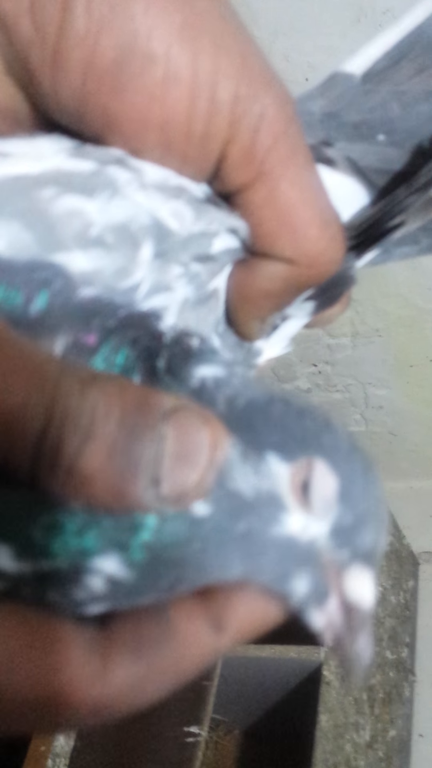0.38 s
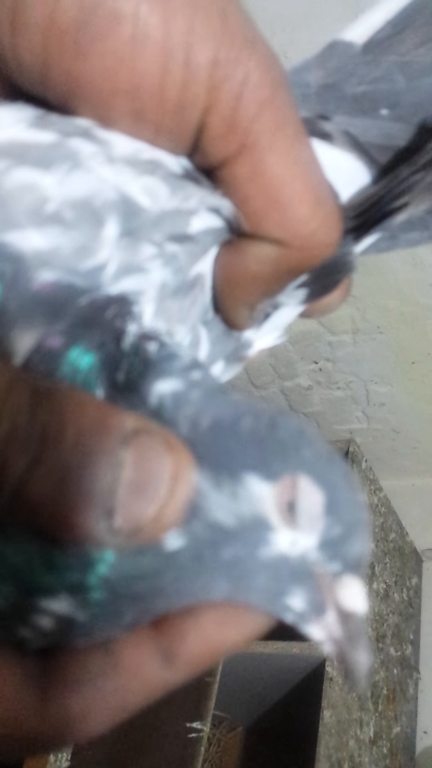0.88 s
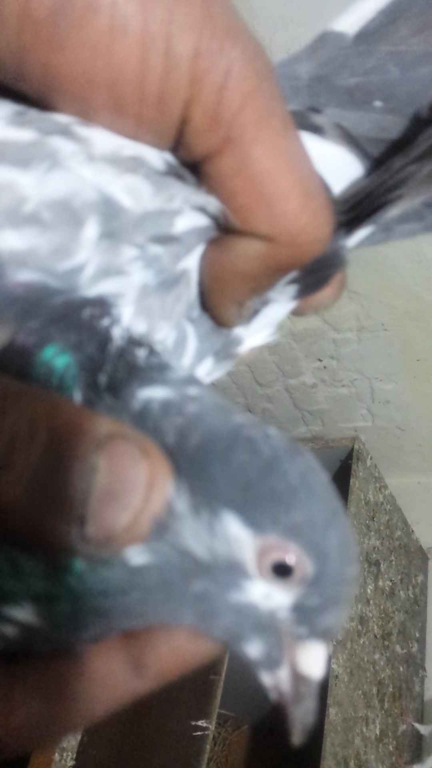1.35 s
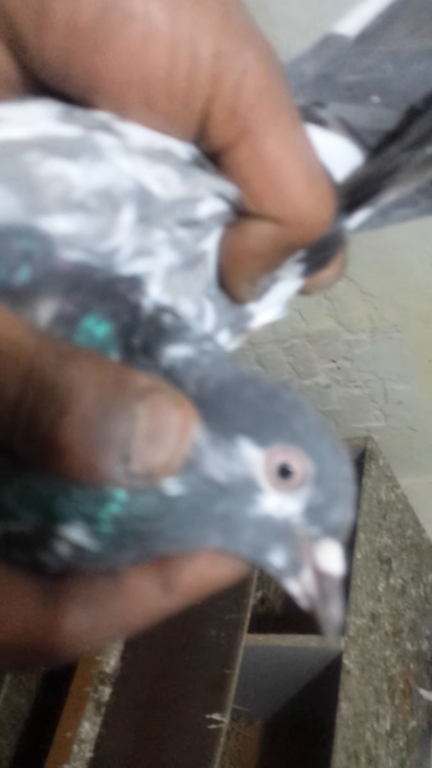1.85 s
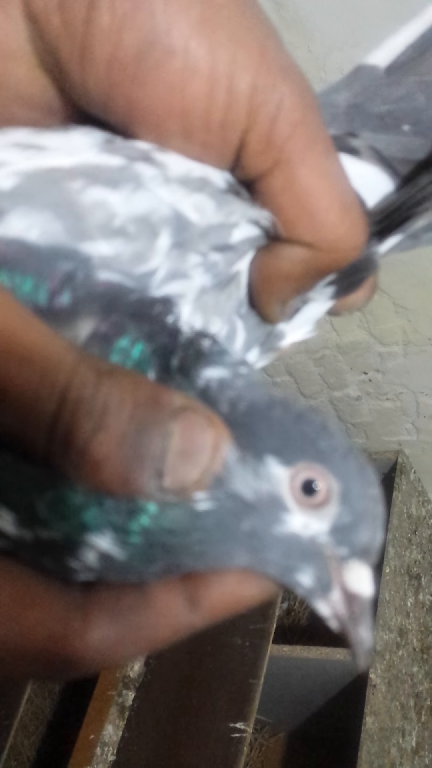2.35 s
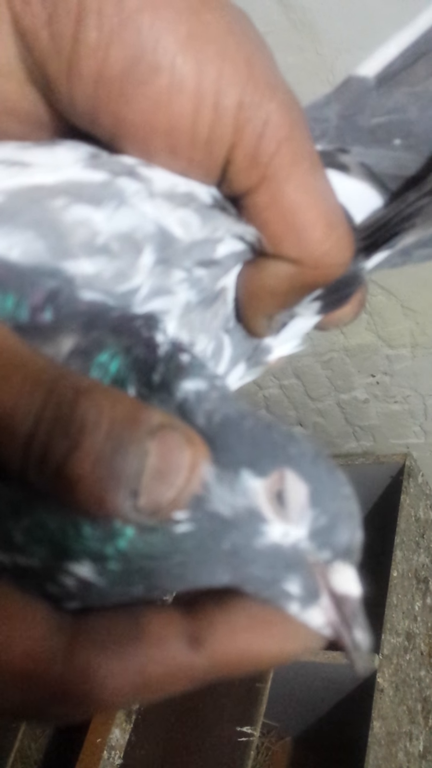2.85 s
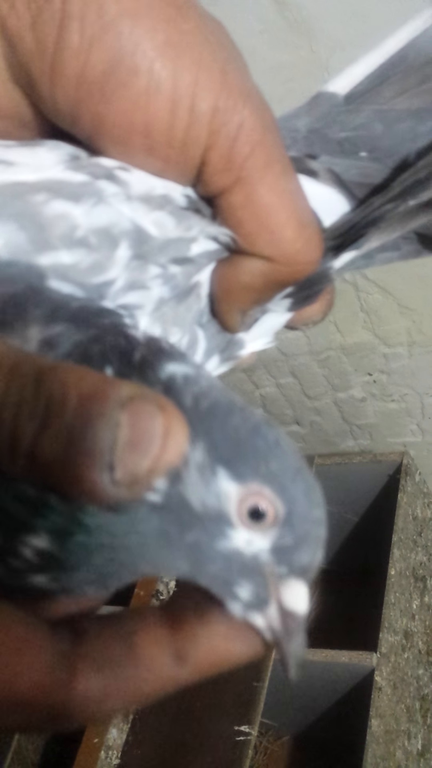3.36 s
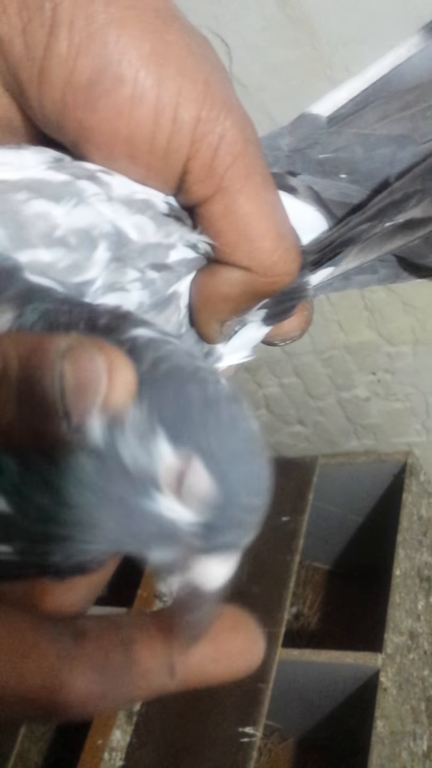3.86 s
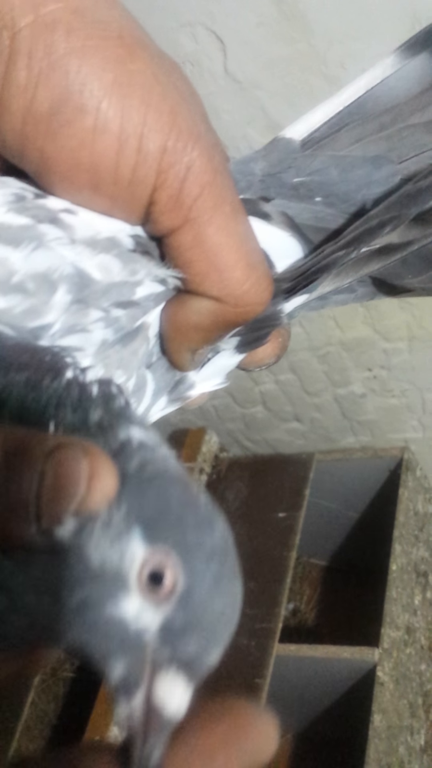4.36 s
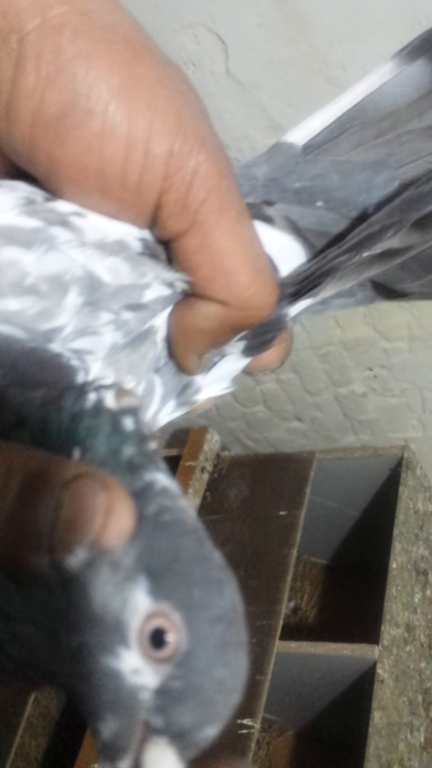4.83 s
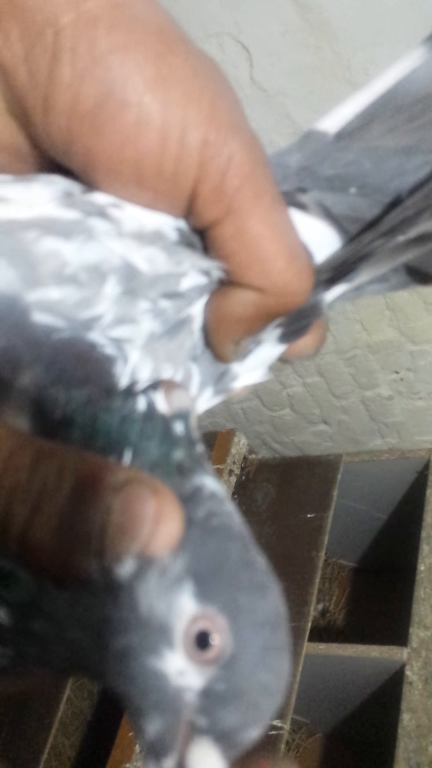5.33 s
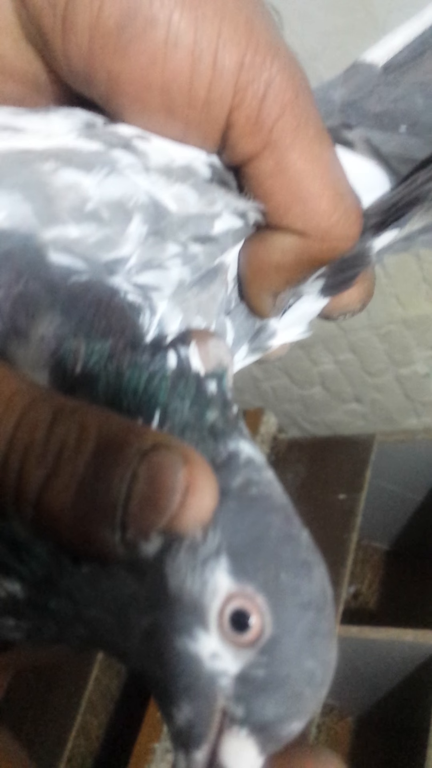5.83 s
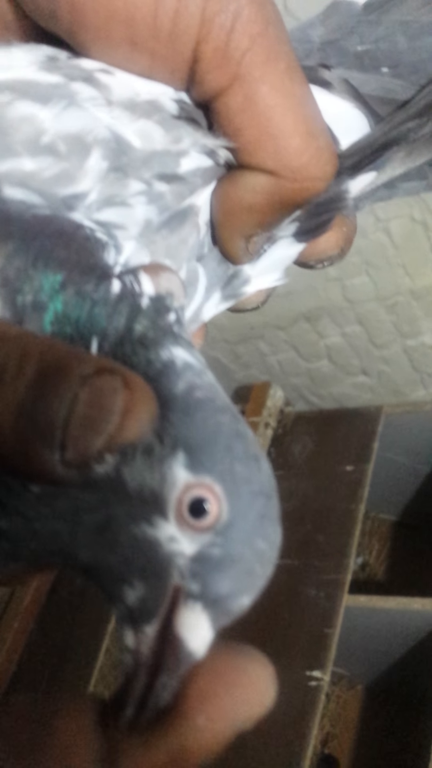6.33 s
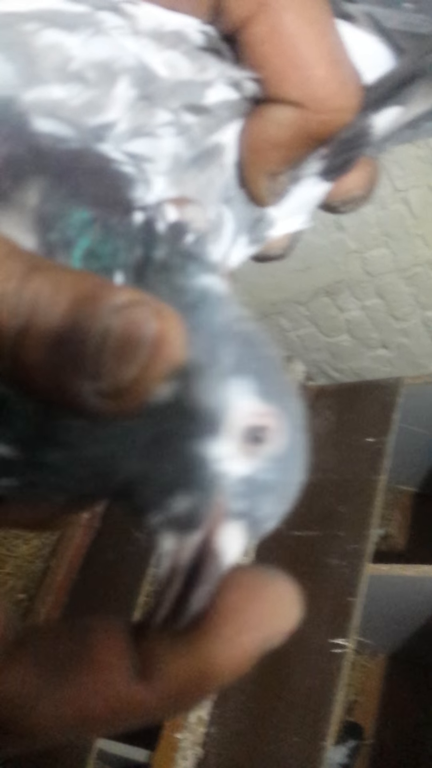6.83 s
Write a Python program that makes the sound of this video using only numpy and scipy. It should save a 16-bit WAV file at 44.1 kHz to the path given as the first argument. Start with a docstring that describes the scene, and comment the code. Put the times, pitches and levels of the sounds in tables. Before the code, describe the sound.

A bird is handled close to a small two-port microphone in a small boarded room. Dry snaps, scrapes and two light knocks come first, then a brief grunt and a violent flap, two strong strokes with low thuds on boards. Smaller cracks and rustles follow, dwindling. The last seconds are very quiet: fine feather strokes, faint distant mewing calls, and needle-thin squeaks.

```python
"""Wooden pigeon loft, inside; a phone's two microphone ports take one held bird close, others shifting about.
Close: feathers and claws snap and scrape as clicks and clumps of clicks; a short grunt sounds.
Feet and wings thump on the boards, noise pushing resonances; one bird beats off loudly.
Later: mostly soft rustling of fine grains, with a few faint cracks and thumps,
thin squeaks of filtered noise and a far mewing of four partials."""
import sys
import numpy as np
from scipy import signal
from scipy.fft import rfft, irfft
from scipy.io import wavfile

SR = 44100
rng = np.random.default_rng(int(sys.argv[2]) if len(sys.argv) > 2 else 0)


def ratio_of_db(decibels):
    """Turn decibels (scalar or array-like) into linear amplitude factors; 0 dB maps to 1."""
    return 10 ** (np.asarray(decibels, float) / 20)


def bounce(signal):
    """Save signal as a 16-bit WAV file at the path given by the first command-line argument."""
    frames = np.transpose(np.atleast_2d(signal))
    limited = np.clip(frames, -1, 1)
    pcm = np.round(limited * 32767).astype(np.int16)
    wavfile.write(sys.argv[1], SR, pcm)


N = 317520   # samples, 7.2 s

# All levels are relative: the functions add the gain of their source.
# sharp cracks of quills and claws: t/s, level/dB, lean to the left/dB (6 dB stands for the middle)
CRACKS = [(0.024, -33, 14), (0.0681, -30, 23), (.1937, -25, 17), (0.1981, -18, 18), (0.336, -47, 20),
          (.3454, -35, 6), (.5191, -44.5, 17), (.55, -24, 14), (.594, -27, 0), (0.7807, -30.5, 10),
          (.796, -28, 16), (0.8046, -25.5, 19), (1.4104, -28, 17), (1.7291, -24, 19.5), (1.838, -36, 20),
          (1.88, -41.5, -7), (1.9388, -50, 19), (2.047, -45, 10), (2.0756, -27.5, 22.5),
          (2.1706, -41.5, 29), (2.1774, -36, 26), (2.299, -29.5, 13.5), (2.367, -36.5, 19),
          (2.3813, -34, 16), (2.5045, -38, 31), (2.6723, -21, 10), (2.9726, -49, 5), (3.083, -35.5, 15),
          (3.238, -42.5, 25), (3.2544, -37, 29), (3.3138, -35.5, 21), (3.3377, -31, 16.5),
          (3.485, -49.5, 24), (3.6059, -35, 23), (3.6101, -26.5, 20), (3.723, -45.5, 21),
          (3.7523, -45, 18.5), (3.833, -39, -2), (3.8402, -16.5, 7), (3.987, -32, 18), (3.9935, -30, 33.5),
          (4.138, -33.5, 17), (4.152, -34, 14), (4.1899, -30, 17), (4.342, -35, 24), (6.3815, -49, 11.5),
          (6.528, -50, 17), (6.6823, -38, 12), (6.703, -45, 17), (7.0232, -45, -1)]
# feather scrapes: t/s, level/dB, dull body against it/dB, t60 of the bright part/s
SCRAPES = [(0.023, -25, -28, 0.1), (0.068, -14, -28, 0.01), (0.1984, -24, -17.5, 0.03),
           (0.334, -36.5, -19, 0.13), (0.548, -25.5, -19.5, 0.029), (0.593, -27, -20.5, 0.2),
           (0.732, -29, -20, 0.052), (0.807, -25.5, -11.5, 0.11), (0.923, -27, -48, 0.05),
           (1.2836, 2.5, -24.5, 0.021), (1.331, -18.5, -40, 0.096), (1.455, -3, -39, 0.022),
           (1.7232, -25.5, -27.5, 0.15), (1.834, -42, -45, 0.018), (2.0769, -26.5, -15.5, 0.051),
           (2.156, -30, -32, 0.034), (2.301, -50, -36, 0.036), (2.379, -36.5, -14, 0.02),
           (2.5062, -39, -16, 0.083), (2.669, -22.5, -20.5, 0.06), (2.9716, -29.5, -31, 0.013),
           (3.082, -34, -32, 0.18), (3.252, -36, -12, 0.017), (3.3129, -42, -9.5, 0.039),
           (3.3408, -25, -22, 0.014), (3.608, -35.5, -15, 0.05), (3.838, -26.5, -17, 0.037),
           (3.9928, -42, -8.5, 0.047), (4.136, -36, -19, 0.055), (4.1894, -30, -17, 0.032),
           (4.23, -31, -16.5, 0.015), (4.3419, -36.5, -22, 0.024)]
# colour of snapping feathers: f/Hz, spectrum level/dB
FEATHER_COLOUR = [(530, -47), (900, -18.5), (1310, -28.5), (1720, -13.5), (2100, -9.5), (2450, -10),
                  (2790, -13.5), (5850, 3), (6580, 4), (7400, 1), (14000, -26.5), (15000, -27)]
# thumps on the boards: t/s, level/dB, centre f of the shaken boards/Hz, t60 of the push/s
THUMPS = [(.029, -54, 97, .11), (0.197, -40.5, 266, 0.064), (.237, -38, 97.5, 0.059),
          (0.34, -50, 291, 0.23), (.562, -36, 218, .044), (0.738, -43, 226, .091),
          (0.812, -42.5, 202, 0.31), (1.015, -41.5, 351.3, 0.19), (1.138, -25, 150, 0.072),
          (1.186, -31.5, 247, .14), (1.232, -36.5, 263, 0.052), (1.297, -8.5, 150, 0.05),
          (1.312, -13.5, 210, 0.035), (1.34, -22.5, 315, 0.069), (1.39, -25.5, 207, 0.048),
          (1.458, -27.5, 312, 0.12), (1.497, -31.5, 238, 0.03), (1.558, -43, 99, .11),
          (1.734, -38, 285, 0.18), (1.829, -41, 94, 0.042), (2.084, -56, 277, 0.47),
          (2.173, -41, 223, 0.092), (2.387, -46.5, 454, 0.074), (2.504, -33, 315, 0.056),
          (2.678, -43, 206, 0.22), (2.992, -44, 293, 0.038), (3.085, -41.5, 162, 0.11),
          (3.138, -59, 240, .062), (3.345, -34.5, 199, 0.091), (3.391, -49, 157, 0.062),
          (3.621, -54.5, 165, 0.11), (3.842, -45.5, 802, 0.031), (4.007, -56, 202, 0.037),
          (4.2, -53, 323, 0.27), (4.348, -55, 214.3, 0.059), (5.561, -57, 293.3, 0.1),
          (6.332, -56.5, 110, 0.21), (6.952, -62, 223, 0.14), (7.026, -52.5, 393, .16)]
# resonances of the boards: f/Hz, width before damping by the feet/Hz, level/dB
BOARD_MODES = [(66, 20, -9.5), (101, 12, -3), (187, 27, -7), (200, 39, -9.5), (228.7, 44, -6.5),
               (336, 9.7, -15), (393, 9.7, -16.5), (505, 50, -6), (667, 210, -5), (740, 64, -3.5),
               (1092, 74, -9)]
# dry knocks close by: t/s, level/dB, f/Hz
KNOCKS = [(0.067, -23.5, 696), (0.634, -30.5, 586)]
# restlessness of the birds: t/s, feather rustle level/dB, shuffling on the boards level/dB
RESTLESSNESS = [(0, -53.5, -53), (.12, -69, -56), (.24, -53.5, -55), (.45, -62.5, -65), (.73, -53.5, -49),
                (.95, -47.5, -58.5), (1.08, -39.5, -49.5), (1.21, -38, -48.5), (1.36, -44.5, -37),
                (1.51, -45, -41), (1.7, -68, -65), (1.86, -58, -55), (1.97, -69.5, -69.5),
                (2.27, -57.5, -62), (2.61, -62.5, -52), (2.8, -68, -74.5), (2.97, -63.5, -66),
                (3.05, -60.5, -54.5), (3.27, -56, -60.5), (3.43, -58, -60.5), (3.66, -59.5, -70.5),
                (3.8, -59, -61), (4.2, -67, -63), (4.47, -75, -73), (5.06, -72, -73.5), (5.4, -67.5, -72),
                (5.85, -68.5, -68.5), (5.96, -75.5, -72), (6.07, -77, -78.5), (6.4, -61.5, -66),
                (6.7, -64, -65), (6.8, -71, -70), (7.2, -69.5, -69)]
# soft strokes through the feathers, before they linger:
# middle t/s, length/s, level/dB, treble above 9 kHz against it/dB
STROKES = [(5.099, .08, -64, -10), (5.213, 0.18, -61, 5.5), (5.316, 0.16, -63.5, 4),
           (5.45, 0.18, -58.5, 2.5), (5.549, 0.1, -58.5, 12.5), (5.69, 0.045, -61, 9.5),
           (5.769, 0.098, -63, 9.5), (6.156, 0.18, -64, 7), (6.244, 0.13, -55, 1), (6.328, 0.052, -61, 0),
           (6.423, 0.083, -57.5, 3), (6.543, 0.15, -57.5, -6), (6.646, 0.24, -57.5, 4),
           (6.855, 0.11, -62.5, -12), (6.966, 0.04, -58.5, -9), (7.034, 0.07, -59, -9),
           (7.124, 0.025, -63.5, 5.5)]
# colour of the rustle: f/Hz, spectrum level/dB
RUSTLE_COLOUR = [(240, -17), (400, -5), (432, -18.5), (495, -8), (576, -11), (841, -6.5), (1100, -9),
                 (3830, -10), (6710, -5), (13100, -16), (15000, -25.5)]
# colour of the shuffling: f/Hz, spectrum level/dB
SHUFFLE_COLOUR = [(18, -55.5), (30, -8), (75, 8), (245, 3.5), (349, -3.5), (427, -5), (530, -6),
                  (967, -17.5), (1200, -23.5), (1560, -40.5), (2640, -120)]
# a short creaking grunt: t/s, pitch f/Hz, level/dB,
# mouth opening as lift of partials three and four over the second/dB
GRUNT = [(1.03, 496, -60.5, -9.5), (1.043, 532, -39.5, -11), (1.057, 579, -38.5, 0),
         (1.111, 599, -54.5, -8), (1.125, 580, -61, 0)]
# throat of the grunt: f/Hz, level of a partial there/dB
GRUNT_THROAT = [(500, 1.5), (620, -1.5), (1040, -20.5), (1180, -8), (1560, -14), (1760, -9), (2100, -14),
                (2400, -23.5)]
# thin squeaks: t/s, length/s, f/Hz, level/dB
SQUEAKS = [(5.85, 0.076, 11070, -66), (5.997, 0.045, 12800, -73.5), (6.14, 0.063, 12700, -66),
           (6.374, 0.047, 12000, -53), (6.601, .07, 11500, -55.5), (6.832, 0.072, 11900, -50.5)]
# far mewing calls, one list each: t/s, pitch f/Hz, level/dB, mouth opening as for the grunt/dB
MEWS = [
    [(4.7, 686, -89, 1.5), (4.84, 712, -81, 8), (4.85, 862, -76, -23), (4.92, 915, -69, -11.5),
     (5.01, 941, -70.5, 2), (5.11, 903, -70.5, -1), (5.3, 806.5, -76, 2.5), (5.5, 717, -73, -3),
     (5.58, 690, -98, 6)],
    [(6.14, 669.5, -85.5, 0), (6.305, 702, -82, -0.5), (6.32, 868, -75, -26), (6.4, 879, -68, -6),
     (6.455, 868, -71, -2), (6.49, 844, -75.5, 8), (6.58, 819.5, -72, 12.5), (6.76, 744, -70.5, -3.5),
     (6.84, 698, -81, 6), (6.92, 680, -88.5, 2)],
]
# throat of the mewing: f/Hz, level of a partial there/dB
MEW_THROAT = [(680, -5.5), (760, 3), (870, -4), (940, 0.5), (1450, -5), (1650, -3.5), (1750, 1.5),
              (1900, 0.5), (2150, -3), (2480, 6.5), (2650, -2.5), (2820, -5), (3050, -4), (3300, -18),
              (3700, -32)]
# dying away of the loft: f/Hz, t60/s
LOFT_T60 = [(85, .5), (340, 0.25), (1360, 0.15), (5400, 0.18), (11000, 0.18)]
# strength of the loft's tail: f/Hz, level/dB
LOFT_LEVEL = [(85, 3.5), (340, 8.5), (1360, 5.5), (5400, 4), (11000, 4.5)]
# colour of the background air: f/Hz, spectrum level/dB
AIR_COLOUR = [(20, -30.5), (50, -23.5), (110, -14.5), (210, -11.5), (300, -13), (700, -24.5), (1500, -23),
              (4000, -27), (6500, -28), (9000, -30), (15000, -24.5)]
# difference between the microphone ports: f/Hz, left over right level/dB
PORT_TILT = [(500, 1.5), (1200, 2), (2700, 5.5), (4200, -1), (6400, 8), (8000, -1.5), (10000, -4),
             (15000, -5)]

ALIKE_BELOW_HZ, RIGHT_LAG_S = 896, 0.0002884


def at_hz(points, hz):
    """Read (f/Hz, value) points on a log frequency axis."""
    points_hz, values = np.transpose(points)
    return np.interp(np.log(hz), np.log(points_hz), values)


def in_time(rows):
    """Columns of a curve against its times, joined by straight lines."""
    s, *columns = np.transpose(rows)
    return [np.interp(np.arange(N) / SR, s, column) for column in columns]


def rms_one(x):
    """Scale to rms 1."""
    return x / np.sqrt(np.mean(x ** 2) + 1e-20)


def cut(x, hz, kind, order=2):
    """Butterworth filter."""
    return signal.sosfilt(signal.butter(order, hz, kind, fs=SR, output="sos"), x)


def colour(x, points, size=8192):
    """Causal filter of unit energy with this spectrum (minimum phase by the folded cepstrum)."""
    hz = np.maximum(np.fft.rfftfreq(size, 1 / SR), 1)
    cepstrum = irfft(np.log(ratio_of_db(at_hz(points, hz))))
    cepstrum[1:size // 2] *= 2
    cepstrum[size // 2 + 1:] = 0
    pulse = irfft(np.exp(rfft(cepstrum)))
    return signal.fftconvolve(np.atleast_2d(x), [pulse / np.linalg.norm(pulse)], axes=1)[:, :N]


def pair(size):
    """Noise at the two ports: alike in the bass, unrelated in the treble."""
    mid, left, right = rng.standard_normal((3, size))
    return cut(mid, ALIKE_BELOW_HZ, "low") + cut([left, right], ALIKE_BELOW_HZ, "high", order=1)


def grains(per_s, spread_db):
    """Random clicks of uneven size and either sign; rms 1."""
    sizes = ratio_of_db(spread_db * np.minimum(rng.exponential(1, N), 4)) * rng.choice([-1, 1], N)
    return rms_one(sizes * (rng.random(N) < per_s / SR))


def bursts(times, peaks_db, t60s, rise_s):
    """Envelope: each event rises quickly and dies at its own rate."""
    power, t = np.zeros(N), np.arange(SR // 4) / SR
    rise, after = np.minimum(t / rise_s, 1) ** 2, np.maximum(t - rise_s, 0)
    for s, db, t60 in zip(times, peaks_db, t60s):
        i = max(round((s - rise_s) * SR), 0)
        dying = np.exp(-np.log(1e6) * after / max(t60, .002))
        power[i:i + len(t)] += (rise * ratio_of_db(2 * db) * dying)[:N - i]
    return np.sqrt(power)


def cracks():
    """Single clicks, mostly stronger left, and their echoes off the nearest boards within three milliseconds."""
    s, db, lean_db = np.transpose(CRACKS)
    chance = rng.uniform(-1, 1, (len(s), 8))
    clicks, echoes = np.zeros((2, N)), np.zeros((2, N))
    at = np.round(s * SR).astype(int)
    size = ratio_of_db(db + 8.0 + (lean_db - 6.0) * [[.5], [-.5]])
    clicks[:, at] = size * np.sign(chance[:, 0])
    for k, share in enumerate([.75, .55, .35]):
        late = ((k + 1) * (30 + 12 * chance[:, k + 1])).astype(int)   # samples
        echoes[:, at + late] += share * size * np.sign(chance[:, k + 4])
    return [cut(colour(x, FEATHER_COLOUR), 2400, "high") for x in (clicks, echoes)]


def scrapes():
    """Clumps of tiny cracks, bright, over a duller and longer body."""
    s, db, body_db, t60 = np.transpose(SCRAPES)
    clumps = bursts(s, db - 14.5, t60, rise_s=0.0011) * grains(4500, 1.3)
    bright = colour(clumps, FEATHER_COLOUR)[0]
    body = rms_one(cut(grains(4000, 0.82), [700, 3000], "band"))
    return bright + body * bursts(s, db + body_db - 9.5, 4.5 * t60, rise_s=0.014)


def boards():
    """Thumps are soft pushes of noise that shake mostly the boards tuned near their centre."""
    s, db, centre_hz, t60 = np.transpose(THUMPS)
    out = np.zeros(N)
    for hz, width, level_db in BOARD_MODES:
        r = np.exp(-np.pi * 1.6 * width / SR)     # feet on the boards damp them
        away_db = -6 * np.log2(hz / centre_hz) ** 2   # 6 dB down one octave away
        push = rng.standard_normal(N) * bursts(s, db + np.maximum(away_db, -40), t60, rise_s=.006)
        resonance = [1, -2 * r * np.cos(2 * np.pi * hz / SR), r * r]
        ring = signal.lfilter([1, 0, -1], resonance, push + 1e-18)
        out += ratio_of_db(level_db - 5.5) * np.sqrt((1 - r * r) / 2) * ring
    return out


def knocks():
    """A hard tap close by is a sine that falls 60 dB in 4.2 cycles."""
    out, t = np.zeros(N), np.arange(SR // 50) / SR
    for s, db, hz in KNOCKS:
        i = round(s * SR)
        out[i:i + len(t)] += ratio_of_db(db + 9 - 60 * t * hz / 4.2) * np.sin(2 * np.pi * hz * t)
    return cut(out, 220, "high")


def stirring():
    """Dense, uneven feather grains, swelling with each stroke, and a low shuffle under the single events."""
    rustle_db, shuffle_db = in_time(RESTLESSNESS)
    treble_rustle_db = rustle_db - 0.5 - 0.09 * (rustle_db + 59)   # harder rustle is duller
    full, treble = ratio_of_db(2 * rustle_db), ratio_of_db(2 * treble_rustle_db)   # powers
    keep = ratio_of_db(-120 / (0.21 * SR))   # each stroke lingers in the loft, t60 0.21 s
    for s, length, db, treble_db in STROKES:
        swell = np.cos(np.pi * np.clip((np.arange(N) / SR - s) / length, -.5, .5)) ** 4
        swell = signal.lfilter([1 - keep], [1, -keep], swell)
        full = full + swell * ratio_of_db(2 * db)
        treble = treble + swell * ratio_of_db(2 * (db + treble_db))
    uneven_db = 2.0 * rms_one(cut(rng.standard_normal(N), 25, "low"))
    feathers = colour([grains(9000, 3.1), grains(9000, 4.5)], RUSTLE_COLOUR)
    high = cut(feathers, 9000, "high", order=1)
    rustle = (feathers - high) * np.sqrt(full) + high * np.sqrt(treble)
    shuffle = rms_one(colour(pair(N), SHUFFLE_COLOUR)) * ratio_of_db(shuffle_db)
    return rustle * ratio_of_db(uneven_db) + shuffle


def voice(call, throat, tremble, rough_db, patchy_db):
    """Four partials through a fixed throat; the pitch trembles, each partial flutters and slowly comes and goes."""
    t = np.arange(N) / SR
    hz, db, mouth_db = in_time(call)

    def slow_noise(rows, hz):
        """Noise below this frequency, made at a tenth of the rate and held."""
        return rms_one(cut(rng.standard_normal((rows, N // 10)), 10 * hz, "low")).repeat(10, axis=1)

    wobble, *flutter = slow_noise(5, 60)
    patches = slow_noise(4, 12)
    phase = 2 * np.pi * np.cumsum(hz * (1 + tremble * wobble)) / SR
    out = np.zeros(N)
    for k, mouth_share in enumerate([0, -.3, .7, .7]):
        partial_db = db + mouth_share * mouth_db + at_hz(throat, (k + 1) * hz)
        uneven_db = rough_db * flutter[k] + patchy_db * patches[k]
        out += np.sqrt(2) * ratio_of_db(partial_db + uneven_db) * np.sin((k + 1) * phase)
    return out * ((t > call[0][0]) & (t < call[-1][0]))


def grunt():
    """A short rough voice whose pitch trembles widely, so that it creaks."""
    return voice(GRUNT, GRUNT_THROAT, tremble=.07, rough_db=4, patchy_db=2)


def squeaks():
    """Short puffs of noise through a high resonance, close by and dry."""
    out, width_hz = np.zeros((2, N)), 600
    for s, length, hz, db in SQUEAKS:
        i, size = round(s * SR), round(length * SR)
        puff = cut(rng.standard_normal((2, SR // 4)), [hz - width_hz / 2, hz + width_hz / 2], "band")
        flutter_db = 3.6 * rms_one(cut(rng.standard_normal(size), 150, "low")) - 1
        envelope = np.sqrt(np.hanning(size)) * ratio_of_db(flutter_db)
        out[:, i:i + size] += ratio_of_db(db) * rms_one(puff)[:, -size:] * envelope
    return cut(out, 90, "high", order=3)


def mews():
    """Far calls: a steadier voice whose pitch rises and then sinks."""
    return sum(voice(call, MEW_THROAT, tremble=.006, rough_db=2, patchy_db=1.5) for call in MEWS)


def loft(x):
    """Diffuse tail: octave bands of noise, each dying at its own rate."""
    t, tail = np.arange(SR // 2) / SR, 0
    noise = pair(len(t)), pair(len(t))     # neighbouring bands are unrelated
    for k, hz in enumerate(85 * 2. ** np.arange(8)):
        band = cut(noise[k % 2], [hz / np.sqrt(2), hz * np.sqrt(2)], "band")
        dying = ratio_of_db(-60 * t / at_hz(LOFT_T60, hz)) * np.minimum(t / 0.002, 1)
        tail = tail + band * dying * ratio_of_db(at_hz(LOFT_LEVEL, hz)) / np.linalg.norm(dying)
    return signal.fftconvolve([x], tail, axes=1)[:, :N]


def air():
    """Steady coloured noise of the background."""
    return ratio_of_db(-71.5) * rms_one(colour(pair(N), AIR_COLOUR))


def scene():
    """Direct sound reaches the right port a little late; the loft adds its tail."""
    clicks, echoes = cracks()
    direct = clicks + scrapes() + boards()
    taps, calls = knocks(), grunt() + mews()
    # close knocks and calls stir the loft less
    tail = loft(direct.mean(axis=0) + ratio_of_db(-15.5) * taps + ratio_of_db(-6) * calls)
    direct = direct + echoes + taps + calls
    n = np.arange(N)
    direct[1] = np.interp(n - RIGHT_LAG_S * SR, n, direct[1])
    return direct + tail + stirring() + squeaks() + air()


def band_limit(x):
    """A steep low-pass at the top of the band."""
    return signal.sosfilt(signal.butter(12, 15850, fs=SR, output="sos"), x)


def record(dry):
    """The two microphone ports differ in colour; bass and top are cut, peaks rounded."""
    low_cut_hz, top_hz, ceiling = 93, 14650, 0.86
    tilt_db = at_hz(PORT_TILT, np.maximum(np.fft.rfftfreq(N, 1 / SR), 1)) / 2
    ports = irfft(rfft(dry) * ratio_of_db(tilt_db * [[1], [-1]]), N)
    x = cut(ports, low_cut_hz, "high", order=1)
    rounded = ceiling * np.tanh(x / ceiling)
    top_cut = signal.ellip(8, .5, 35, top_hz, fs=SR, output="sos")
    mix = signal.sosfilt(top_cut, rounded)
    return band_limit(mix)


dry = scene()
out = record(dry)
bounce(out)
```